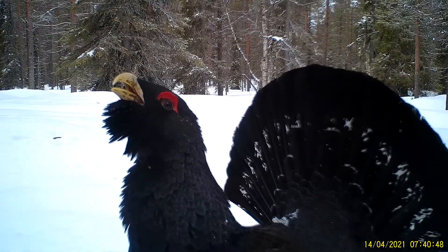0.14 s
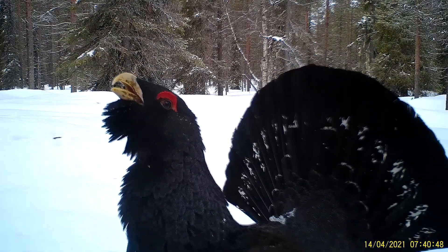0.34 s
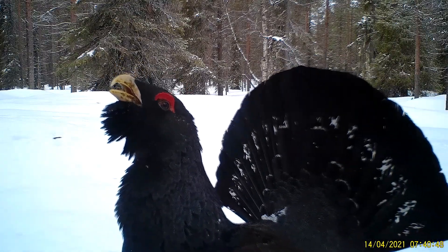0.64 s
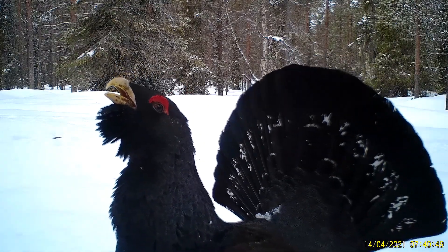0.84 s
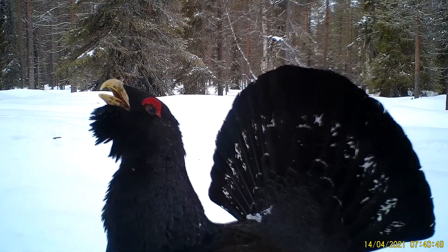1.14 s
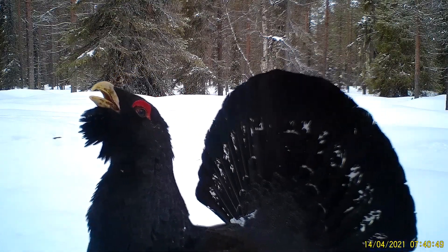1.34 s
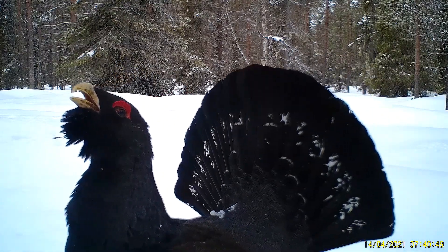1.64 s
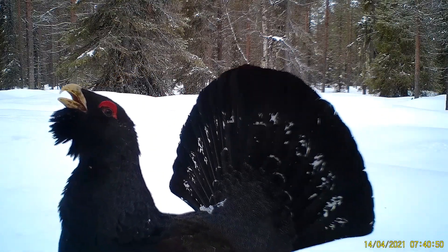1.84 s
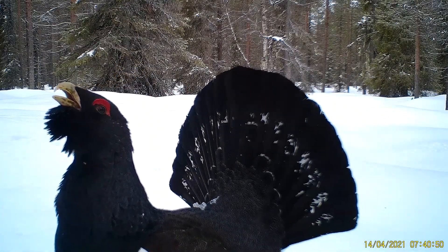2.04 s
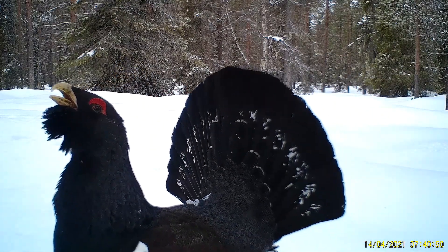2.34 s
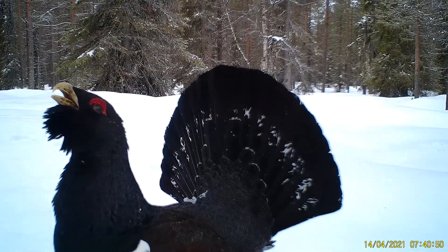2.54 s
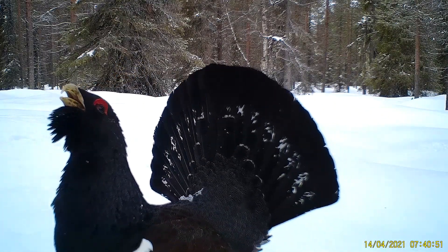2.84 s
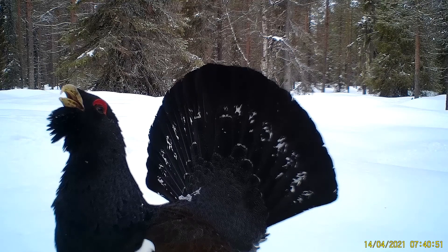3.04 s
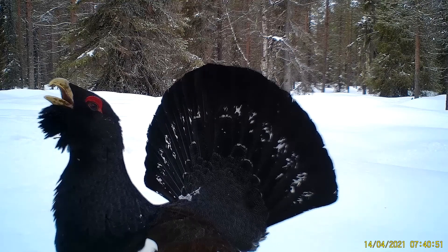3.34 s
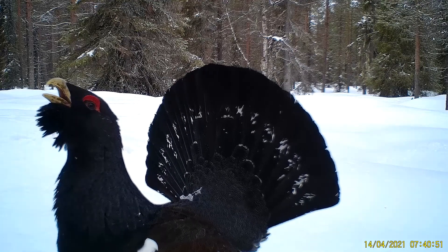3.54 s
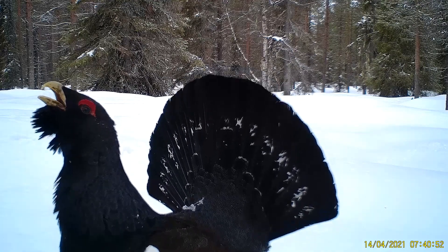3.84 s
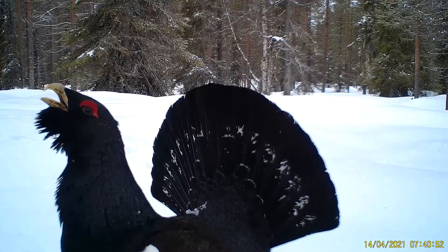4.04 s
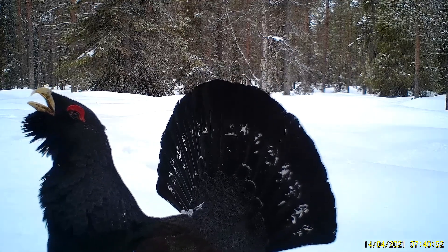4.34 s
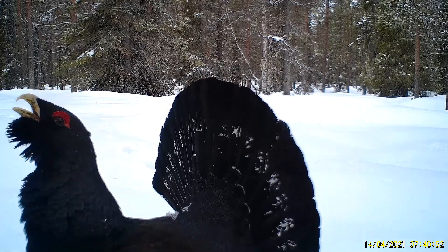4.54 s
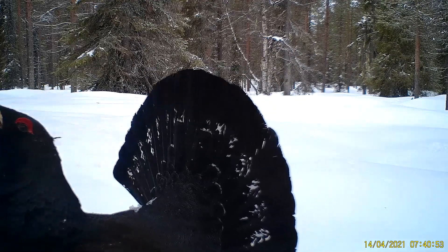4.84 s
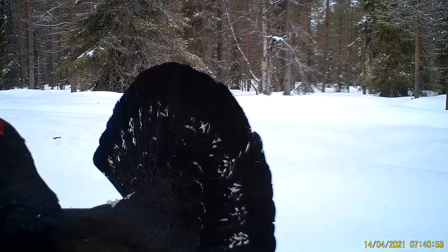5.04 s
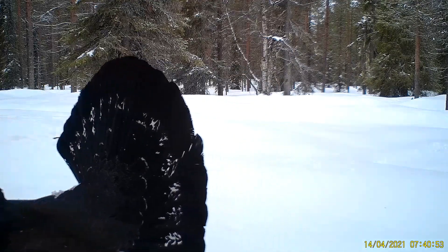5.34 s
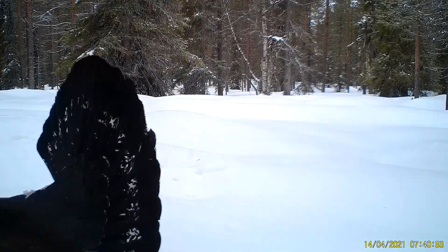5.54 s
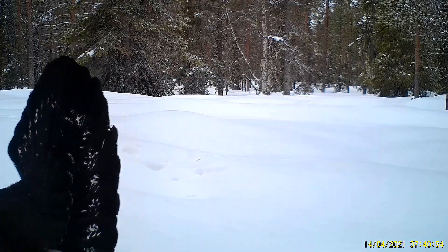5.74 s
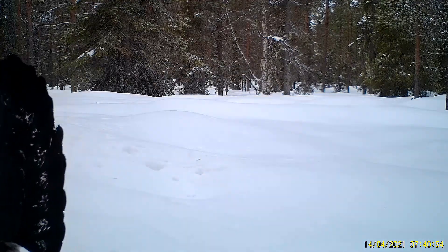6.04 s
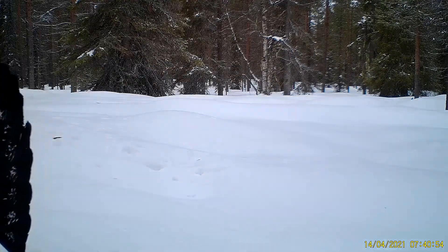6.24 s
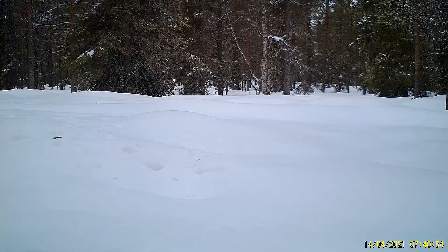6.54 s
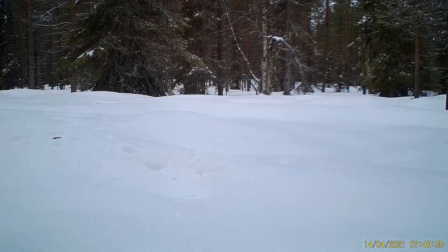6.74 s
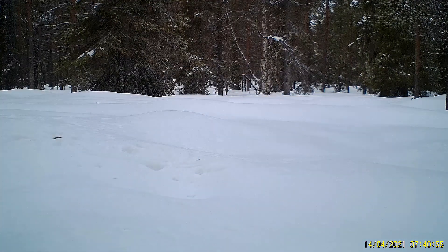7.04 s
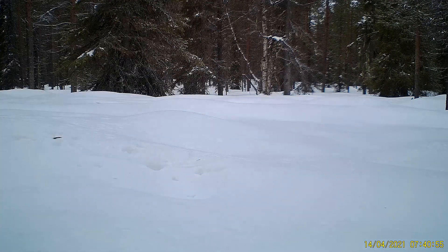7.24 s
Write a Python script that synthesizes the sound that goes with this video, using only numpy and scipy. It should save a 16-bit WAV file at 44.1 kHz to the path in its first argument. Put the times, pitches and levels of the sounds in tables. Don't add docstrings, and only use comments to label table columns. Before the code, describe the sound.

Very quiet outdoor air with small wind bumps and thin hiss. Sparse icy ticks and brief crunches come from feet on frozen snow, and a rival clicks faintly far away. Midway, two throat snaps almost fused into one pop far above everything else, with faint trunk echoes. A crunchy stamp follows, then a long scratchy rustle of quills over ice crystals, swelling in strides, dropping, and returning weaker. Near, dry, essentially mono pickup.

```python
import sys
import numpy as np
from scipy import signal
from scipy.fft import rfft, irfft, next_fast_len
from scipy.io import wavfile
from scipy.ndimage import uniform_filter1d

SR = 44100
rng = np.random.default_rng(int(sys.argv[2]) if len(sys.argv) > 2 else 0)


def store_wav(level_fs):
    pcm = np.round(np.clip(np.atleast_2d(level_fs), -1, 1) * 32767)
    wavfile.write(sys.argv[1], SR, pcm.T.astype(np.int16))


def undo_db(level):
    steps = np.asarray(level, float) / 20
    return 10 ** steps


N = 326278

# peak t/s, level/dB, half length/s
GUSTS = [(0.02, -66, 0.02), (0.113, -52, 0.048), (0.257, -54, 0.038), (.33, -61, 0.21), (0.83, -58, 0.025),
         (1.257, -58, 0.036), (1.83, -55, 0.023), (1.927, -48.5, 0.04), (2.12, -52.5, 0.02),
         (2.523, -54, 0.065), (2.64, -60, 0.062), (2.828, -56, 0.033), (3.178, -60.5, 0.072),
         (3.617, -65, 0.036), (3.92, -58, 0.034), (4.906, -54, 0.054), (5.055, -54, 0.031),
         (5.182, -67, 0.044), (5.4, -59, 0.023), (5.6, -54, 0.044), (5.691, -47.5, 0.027),
         (6.14, -61, 0.033), (6.305, -57.5, 0.024), (6.442, -53, 0.021)]
CALM_DB, CALM_SWING_DB = -69.5, 2
# t/s, level/dB
WOOD = [(0, -68.5), (.3, -65.5), (.7, -70), (1.4, -67), (1.8, -68), (2.15, -66.5), (2.5, -68),
        (3.55, -69.5), (3.72, -70.5), (3.9, -65), (4.25, -72.5), (7.4, -69)]
# f/Hz, level/dB per Hz
MURMUR = [(29, -25.5), (50, -1.5), (495, -11.5), (757, -16.5), (1030, -14.5), (2500, -28.5), (3250, -58.5),
          (5500, -120)]
RUMBLE_DB, RUMBLE_FOLLOWS = -62, 0.41
# f/Hz, level/dB per Hz
CIRCUIT = [(710, -38.5), (1200, -9.5), (2470, -9.5), (5150, -10), (6900, -9), (9330, -11.5), (14100, -10),
           (15200, -14.5), (15800, -18)]
CIRCUIT_DB = -71

# t/s, peak level/dB, dull part/dB, sharp part/dB
FOOT_TICKS = [(.671, -50, -15, -10), (0.833, -57, -11, -13), (.893, -47, -9, -14), (0.953, -50, -15, -1),
              (.9956, -59, -14, 0), (1.0794, -49, -8, -3), (1.0979, -50, -19, -16), (1.106, -47, -4, 2),
              (1.118, -48, -21, -6), (1.206, -46, -17, -3), (1.3835, -46.5, -3.5, -9),
              (1.516, -38.5, -22, -12), (1.547, -44, -6, 1), (1.5748, -46, -24, -21),
              (1.8432, -53, -17, -18), (1.912, -64, -16, -17), (1.961, -55, -19, 5), (2.0123, -54, -1, -2),
              (2.188, -58, -17, 0), (2.1974, -62, -13, -14), (2.362, -54, -19, -16), (2.442, -64, -18, -18),
              (2.462, -47.5, -23, -24), (2.574, -50, -19, -8), (2.695, -52, -26, -2),
              (2.8766, -50, -18, -5), (2.984, -66, -8, -15),
              (3.575, -46.5, -24, -25.5), (3.608, -45.5, -22.5, -20), (3.7269, -58, -16, -9),
              (3.76, -36, -29, -16), (4.0485, -52, -18, -21), (4.1006, -57, -18, -15),
              (4.162, -57, -17, -15.5), (4.4935, -39.5, -20, -22), (4.8103, -37, -29, -18),
              (5.031, -45, -24, -18), (5.3243, -41.5, 3.5, -19), (6.2148, -45.5, -28, 3),
              (6.2654, -43, -22, -17), (6.606, -39.5, -0.5, -20.5), (6.672, -41.5, 1, -15),
              (6.774, -47, -26, -22), (6.813, -54, -7, -15), (6.958, -40, -12, 0), (7.052, -49, -4, -15),
              (7.036, -46, -2, -11), (7.182, -40, -21, -16), (7.19, -49, -25, -22), (7.38, -52, 13, -14)]
TICK_S = 0.005
# t/s, peak level/dB, length/s, dull part/dB, sharp part/dB
CRUNCHES = [(1.2965, -49.5, 0.013, -9, -6), (1.475, -48.5, 0.034, -30, -0.5), (1.6621, -49.5, 0.0097, 1, 6),
            (2.8894, -55.5, 0.034, -17, -2), (3.7615, -37.5, 0.016, -6, 2.5), (3.776, -46, 0.01, -8, -3.5),
            (3.795, -35, 0.04, -23, -20), (3.785, -48, 0.02, -16, -13), (3.8254, -31.5, 0.018, -11, -5),
            (3.8571, -30, 0.011, -16.5, -11), (3.8925, -36.5, 0.012, -4.5, 0),
            (3.936, -47, 0.0087, -3, -12), (3.946, -48, 0.0062, -8, -12), (4.4376, -52, 0.0073, -13, -1),
            (6.271, -29.5, 0.009, -6, -10.5), (6.3355, -29, 0.017, -6, -8.5), (1.095, -52, 0.024, -18, -1),
            (1.495, -49, .05, -22, -9), (1.535, -48, 0.027, -20, -5)]
# t/s, hiss level/dB, swell/dB per s, fade/dB per s, quill weight/dB
BRUSHES = [
    (1.1, -73, 250, 303, 16),
    (1.33, -74.5, 30, 32, 6),
    (1.49, -70, 150, 85, 6.5),
    (1.62, -89, 30, 63, -5),
    (1.78, -86.5, 37, 22, 15),
    (2.08, -79.5, 11, 14.5, 12),
    (3.05, -79.5, 16, 71, 4.5),
    (3.841, -52, 240, 183, 10.5),
]
# t/s, hiss level/dB, quill weight/dB
DRAG = [(4.2, -104, -3), (4.48, -70, 3), (4.65, -64.5, 1), (4.9, -58, 6), (4.96, -61, 6), (5.02, -58.5, 3),
        (5.11, -56, -1), (5.2, -54, -2), (5.275, -47.5, 0), (5.39, -54, 1), (5.53, -53.5, 2.5),
        (5.6, -50, 0.5), (5.755, -48.5, 1), (5.87, -55, 2.5), (5.98, -50, -0.5), (6.06, -55.5, 3),
        (6.13, -49.5, -1), (6.19, -55, 4.5)]
# t/s, hiss level/dB, quill weight/dB
DRAG_STRIDE = [
    (6.25, -64.5, 7.5),
    (6.3, -57, 7.5),
    (6.36, -55, 0.5),
    (6.43, -63, 6.5),
    (6.48, -53.5, -2.5),
    (6.6, -55, 6.5),
    (6.708, -55.5, 4.5),
]
# t/s, hiss level/dB, quill weight/dB
DRAG_FAR = [
    (6.7, -74, -4),
    (6.8, -65.5, 1),
    (6.93, -59.5, 5.5),
    (7.13, -58, 6),
    (7.17, -62.5, 7.5),
    (7.28, -55.5, 2.5),
    (7.4, -61.5, 14),
]
LIFT_DB_PER_S = 422
# f/Hz, level/dB per Hz
DRAG_HISS = [(1470, -35), (2500, -27.5), (3130, -20.5), (4360, -9.5), (4750, -10), (5630, 0.5),
             (6080, -3.5), (7260, -0.5), (10400, -7.5), (11600, -10), (14700, -19), (15800, -28)]
# f/Hz, level/dB per Hz
DRAG_DULL = [(200, 2), (500, -7), (1200, -2.5), (2300, -1.5), (4000, 1), (5000, -2.5), (8000, -28)]
DULL_DB, SHARP_DB, SHARP_FOLLOWS = -12.5, -5, 0.43
# t/s, gain per quill upward/dB
TURN = [(4.4, 1.5), (5.2, 2.5), (5.8, 4.5), (6.2, 3.5), (6.6, 1.5), (7.0, 2.5), (7.4, 0.5)]
OUTER_START_S, OUTER_END_S, OUTER_DB = 5.93, 6.71, -15
OUTER_LOW_HZ, OUTER_HIGH_HZ = 8400, 10400

# t/s, peak level/dB, ring f/Hz
PINS = [(0.673, -49, 6000), (0.8332, -58, 8100), (0.8955, -53, 7000), (0.9563, -50, 8200),
        (0.9961, -62, 6700), (1.0797, -51, 6300), (1.0986, -44, 6100), (1.1214, -52, 5500),
        (1.2098, -46, 5600), (1.2974, -52, 7750), (1.4988, -53, 6900), (1.5185, -43, 6900),
        (1.5317, -50, 8000), (1.5379, -46, 6900), (1.5459, -44, 6440), (1.5998, -53, 6950),
        (1.6226, -55, 6400), (1.658, -58, 7400), (1.6786, -53, 6500), (1.913, -55, 6900),
        (1.9642, -51, 7100), (2.1909, -54, 6500), (2.199, -53, 6850), (2.3642, -60, 6800),
        (2.442, -58, 5600), (2.4666, -55, 6270), (2.6906, -54, 7000), (2.6972, -51.5, 6240),
        (2.7109, -57, 6800), (2.8137, -60, 6800), (2.8779, -54, 7700), (2.9424, -58, 7100),
        (2.9509, -62, 7400), (2.9953, -54, 7500), (3.0268, -53, 6700), (3.0723, -69, 7180),
        (3.7284, -55, 6200), (3.7578, -43, 6700), (3.9295, -48, 6800), (4.0499, -53, 6200),
        (4.1033, -59, 7200), (4.1599, -59.5, 6790), (4.4347, -55, 6900), (4.489, -50, 7400),
        (4.4938, -46, 7100), (4.7287, -43, 7600), (4.7492, -50, 7700), (4.8116, -33.5, 7500),
        (5.0386, -37, 6730), (5.3271, -37, 8200), (5.4499, -33.5, 7400), (5.7386, -33.5, 6900),
        (6.216, -39, 8750), (6.2662, -38, 8600), (6.3069, -43, 6580), (6.311, -40, 6770),
        (6.606, -39, 7500), (6.7125, -53, 7000), (6.7742, -42, 6030), (7.1925, -42, 6000)]
# t/s, peak level/dB, ring f/Hz
FAINT_PINS = [(0.8516, -53, 6150), (0.9961, -54, 8900), (1.1214, -47, 8000), (1.1442, -60, 7050),
              (1.2371, -52, 8000), (1.3022, -47, 6500), (1.3907, -54, 6700), (1.4865, -44, 5850),
              (1.4987, -45, 5900), (1.5527, -49, 6500), (1.6254, -55, 7500), (1.6574, -50, 11150),
              (1.7441, -53, 3500), (1.8389, -53, 7100), (1.8446, -53, 6800), (2.0638, -53, 6150),
              (2.1909, -49, 6900), (2.1991, -51, 6400), (2.2553, -57, 6700), (2.3214, -55, 7250),
              (2.4774, -55, 6030), (2.55, -57, 7200), (2.6173, -52, 7950), (2.8385, -58, 6750),
              (2.854, -54, 5600), (2.8582, -52, 8050), (2.9508, -54, 7700), (2.9647, -57, 7600),
              (2.9741, -57, 7700), (3.0105, -57, 8120), (3.0723, -59, 7250), (3.1098, -59, 7200),
              (3.127, -59, 7700), (3.1444, -56.5, 7650), (3.6089, -54.5, 6300), (3.6299, -56, 5950),
              (3.6425, -59, 7200), (3.6782, -58, 10550), (3.7663, -33, 7450), (3.8075, -33, 7700),
              (3.8297, -31, 6750), (3.9474, -42, 5700), (4.0082, -48, 6800), (4.1638, -56.5, 6300),
              (4.1905, -57, 7600), (4.2099, -59.5, 7400), (4.248, -58, 7900), (4.4382, -50, 6550),
              (4.8886, -43, 7400), (4.9043, -40, 7100), (4.908, -41, 7150), (5.3241, -28, 7650),
              (5.7385, -33, 7060), (6.1501, -35, 7150), (6.9254, -40, 7250), (7.0379, -41, 5100),
              (7.0557, -42, 6250), (7.2095, -43, 7100)]
PIN_DB, FAINT_PIN_DB, PIN_CRACK_DB, PIN_T60_S = 2.5, -3.5, -8.5, 0.0035

# t/s, level/dB, longer ring f/Hz, shorter ring f/Hz, length/s
RIVAL = [
    (1.734, -70, 2440, 5400, 0.085),
    (1.735, -72, 5600, 6100, 0.096),
    (1.736, -70.5, 3650, 2030, 0.063),
    (1.765, -74, 6200, 4700, 0.097),
    (2.03, -65, 2180, 3300, 0.003),
    (2.043, -74, 3300, 2720, 0.1),
    (2.198, -71.5, 3300, 6840, 0.044),
    (2.233, -69, 6340, 3220, 0.042),
    (7.115, -59, 3480, 3970, 0.014),
]
RIVAL_SHORTER_DB = -1.5

RATTLE_START_S, RATTLE_DB, RATTLE_HZ = 2.0277, -52, 2000
RATTLE_GAP_S, RATTLE_LOSS_DB, RATTLE_RISE_HZ = .0103, 1.5, 300
# t/s, peak level/dB, ring f/Hz
SLABS = [
    (3.766, -52, 2200),
    (3.774, -50, 2150),
    (3.938, -50, 2250),
    (6.2725, -42.5, 1490),
    (6.274, -33, 3930),
    (7.381, -43, 2570),
    (7.384, -49, 1700),
    (7.122, -50, 3400),
]
KNOCK_T60_S = 0.013

# t/s, peak level/dB, snow bounce delay/s, bounce level/dB
CLICK = [
    (3.1728, -8.6, .00059, -9),
    (3.1759, -5.6, .00078, -11.5),
]
# f/Hz, level/dB, t60/s
THROAT = [(1290, -13, .012), (1590, -19.5, .008), (2255, -14, .010), (2700, -2.5, .0016), (2890, -21, .011),
          (3200, -25, .01), (3570, -22, .0125), (4100, -24, .011), (5230, -24, .009), (6330, -12.5, .0052),
          (6950, -31, .02), (7700, -17, .0048), (11250, -18, .0046), (12700, -24, .006)]
CHEST_HZ, CHEST_DB, CHEST_T60_S = 505, -29.5, 0.021
BEAK_CUT_HZ = 1180
PUFF_DB, PUFF_T60_S = -32, 0.017
THUMP_HZ, THUMP_DB, THUMP_T60_S = 170, -39, .03
# level/dB, t60/s, low-pass f/Hz
SCATTER = [
    (-33, 0.0321, 12000),
    (-52, 0.13, 5980),
    (-57, 0.28, 5500),
]
# delay/s, level/dB
TRUNKS = [
    (.158, -45.5),
    (0.162, -62),
    (.198, -48),
    (.203, -58),
]

# t/s, step level/dB re mean line
STARVED = [(.196, 7.5), (.661, 8.5), (.939, 11.5), (1.264, 13), (1.427, 15), (1.566, 11), (1.613, 17.5),
           (1.891, 14), (2.472, 12), (2.495, 15), (2.518, 14), (3.006, 15), (3.494, 12.5), (3.54, 12.5),
           (3.61, 9.5), (3.865, 12.5), (4.469, 12), (5.049, 10.5), (5.746, 5.5), (6.024, 9), (6.303, 11),
           (6.466, 7), (7.232, 8.5), (7.278, 9), (7.302, 11), (7.348, 10)]
STEP_FOLLOWS, STEP_SPREAD_DB = 0.41, 4.5
# t/s, low f/Hz, high f/Hz
SPLIT = [(.405, 4700, 6400), (.614, 5700, 7000), (.614, 7700, 11000), (.614, 11800, 13800),
         (.707, 4300, 7000), (.707, 9000, 10400), (.73, 6400, 7600), (.73, 11800, 13000),
         (1.171, 11000, 12400), (1.171, 13800, 15800), (3.099, 5200, 7000), (3.47, 9600, 11000),
         (4.283, 4200, 5200), (4.283, 12400, 13800), (5.189, 6300, 7600), (5.189, 9600, 13000),
         (5.212, 14500, 15800), (5.212, 11000, 12400), (6.071, 5600, 7000), (6.071, 10300, 11800),
         (6.907, 6300, 7600), (6.907, 11700, 13800)]
SPLIT_DB = -4.5
HOP, GRID = 1024, 464


def rms_one(x):
    return x / np.sqrt(np.mean(x ** 2) + 1e-20)


def in_time(rows):
    s, *columns = np.transpose(rows)
    return [np.interp(np.arange(N) / SR, s, c) for c in columns]


def colour(x, spectrum):
    hz, level_db = np.transpose(spectrum)
    size = next_fast_len(N)
    grid_hz = np.arange(size // 2 + 1) * SR / size + 1
    gain = undo_db(np.interp(np.log(grid_hz), np.log(hz), level_db))
    return rms_one(irfft(rfft(x, size) * gain, size)[:N])


def drift(rate_hz):
    r = np.exp(-2 * np.pi * rate_hz / SR)
    return rms_one(signal.lfilter([1], [1, -2 * r, r * r], rng.standard_normal(N + SR))[SR:])


def ring(x, hz, t60_s):
    r, w = undo_db(-60 / (t60_s * SR)), 2 * np.pi * hz / SR
    return signal.lfilter([0, np.sin(w)], [1, -2 * r * np.cos(w), r * r], x + 1e-18)


def fading(length, t60_s):
    return undo_db(-60 * np.arange(length) / SR / t60_s)


def low_pass(x, hz):
    return signal.sosfilt(signal.butter(2, min(hz, 20000), fs=SR, output="sos"), x)


def band_pass(x, order, low_hz, high_hz):
    return signal.sosfilt(signal.butter(order, [low_hz, high_hz], "band", fs=SR, output="sos"), x)


def air(hiss_db):
    t = np.arange(0, N, 64) / SR
    gusts = sum(undo_db(db) * np.exp(-((t - s) / half_s) ** 2) for s, db, half_s in GUSTS)
    gusts = undo_db(CALM_DB + CALM_SWING_DB * drift(3.5)) + np.interp(np.arange(N) / SR, t, gusts)
    wind = band_pass(low_pass(rng.standard_normal(N + SR), 48), 1, 14, 46)[SR:]
    wood_db, = in_time(WOOD)
    rumble_db = RUMBLE_DB + RUMBLE_FOLLOWS * (hiss_db + 50.5)
    murmur = colour(rng.standard_normal(N), MURMUR) * np.hypot(undo_db(wood_db), undo_db(rumble_db))
    murmur *= undo_db(1.5 + 1.2 * drift(16))
    circuit = undo_db(CIRCUIT_DB) * colour(rng.standard_normal(N), CIRCUIT)
    return rms_one(wind) * gusts + murmur + circuit


def drag():
    t = np.arange(N) / SR
    long_db, long_weight = in_time(DRAG + DRAG_STRIDE)
    long_db = long_db - LIFT_DB_PER_S * np.maximum(t - DRAG_STRIDE[-1][0], 0) - 100 * (t < DRAG[0][0])
    far_db, far_weight = in_time(DRAG_FAR)
    levels = [long_db, far_db - 100 * (t < DRAG_FAR[0][0])]
    weights = [long_weight, far_weight]
    for s, db, swell, fade, weight in BRUSHES:
        levels.append(db - swell * np.maximum(s - t, 0) - fade * np.maximum(t - s, 0))
        weights.append(np.full(N, weight))
    power = undo_db(levels) ** 2
    total = power.sum(axis=0)
    return 10 * np.log10(total), (power * weights).sum(axis=0) / total


def crystals(per_s, spread_db):
    sizes = undo_db(spread_db * np.minimum(rng.exponential(1, N), 5)) * rng.choice([-1, 1], N)
    return rms_one(sizes * (rng.random(N) < per_s / SR))


def add_breaks(dull, body, sharp):
    ticks = [(s, peak_db, TICK_S, low_db, high_db) for s, peak_db, low_db, high_db in FOOT_TICKS]
    for events, suddenness, blunt in (ticks, 5.0, 2.1), (CRUNCHES, 3.5, 3.0):
        for s, peak_db, length_s, low_db, high_db in events:
            start = round(s * SR)
            age = np.arange(round(.08 * SR)) / SR / np.clip(length_s, .001, .04)
            shape = ((1 - np.exp(-suddenness * age)) * np.exp(-age ** blunt))[:N - start]
            span = slice(start, start + len(shape))
            for part, part_db in (dull, low_db), (body, 0), (sharp, high_db):
                part[span] = np.hypot(part[span], undo_db(peak_db + part_db - 10.5) * shape)


def quills(hiss):
    out, (turn_db,) = 0, in_time(TURN)
    edges_hz = np.geomspace(2500, 9500, 6)
    for k, edge_hz in enumerate(zip(edges_hz, edges_hz[1:])):
        band = signal.sosfiltfilt(signal.butter(1, edge_hz, "band", fs=SR, output="sos"), hiss)
        out = out + band * undo_db(1.6 * drift(12) + turn_db * (k - 3.4))
    return rms_one(out)


def outer_quill(snaps):
    corners_s = [OUTER_START_S, OUTER_START_S + .08, OUTER_END_S, OUTER_END_S + .01]
    touch = np.interp(np.arange(N) / SR, corners_s, [0, 1, 1, 0])
    return undo_db(OUTER_DB) * touch * rms_one(band_pass(snaps, 4, OUTER_LOW_HZ, OUTER_HIGH_HZ))


def wings(hiss_db, weight_db):
    hiss_db = hiss_db + 0.81 * drift(25) + 0.16 * drift(120)
    dull = undo_db(hiss_db + DULL_DB + weight_db)
    body = undo_db(hiss_db)
    sharp = undo_db(hiss_db + SHARP_DB + SHARP_FOLLOWS * weight_db)
    add_breaks(dull, body, sharp)
    snaps = crystals(12000, spread_db=2.0) + 0.712 * rng.standard_normal(N)
    snaps += 0.04 * crystals(250, spread_db=5.5) * np.clip(body / undo_db(-49), 0, 1)
    hiss = colour(snaps, DRAG_HISS)
    hiss = hiss + undo_db(-8.5) * rms_one(ring(hiss, 7700, 0.00109))
    hiss = hiss + undo_db(-21.0) * rms_one(ring(hiss, 11600, 0.00091))
    top = signal.sosfiltfilt(signal.butter(2, 9500, "high", fs=SR, output="sos"), hiss)
    scrape = quills(hiss) + outer_quill(snaps)
    return dull * colour(snaps, DRAG_DULL) + body * scrape + sharp * rms_one(top)


def pins():
    out, length = np.zeros(N), round(.01 * SR)
    snaps = PINS + [(s, db + FAINT_PIN_DB, hz) for s, db, hz in FAINT_PINS]
    cracks = rng.standard_normal((len(snaps), length)) * fading(length, 0.0017)
    cracks = band_pass(cracks, 2, 3000, 11000)
    for (s, peak_db, hz), crack in zip(snaps, cracks):
        tone = np.sin(2 * np.pi * hz * np.arange(length) / SR) * fading(length, PIN_T60_S)
        start = round(s * SR)
        out[start:start + length] += undo_db(peak_db + PIN_DB) * (tone + undo_db(PIN_CRACK_DB) * crack)
    return out


def rival():
    out, length = np.zeros(N + SR), round(.3 * SR)
    age = np.arange(length) / SR
    for s, level_db, low_hz, high_hz, length_s in RIVAL:
        noise = rng.standard_normal((2, length))
        rings = rms_one(ring(noise[0], low_hz, 0.019))
        rings = rings + undo_db(RIVAL_SHORTER_DB) * rms_one(ring(noise[1], high_hz, 0.0081))
        swell = (1 - np.exp(-age / 0.00069)) * np.exp(-(age / length_s) ** 2)
        start = round(s * SR)
        out[start:start + length] += undo_db(level_db) * rings * swell
    return out[:N]


def knocks():
    rattle = [(RATTLE_START_S + k * RATTLE_GAP_S, RATTLE_DB - k * RATTLE_LOSS_DB,
               RATTLE_HZ + RATTLE_RISE_HZ * min(k, 3)) for k in range(5)]
    out, length = np.zeros(N + SR), round(.02 * SR)
    age = np.arange(length) / SR
    shape = fading(length, KNOCK_T60_S) * (1 - np.exp(-age / 0.00071))
    for s, peak_db, hz in rattle + SLABS:
        tone = np.sin(2 * np.pi * hz * age) + 0.53 * np.sin(2 * np.pi * 1.33 * hz * age)
        start = round(s * SR)
        out[start:start + length] += undo_db(peak_db) * tone * shape
    return out[:N]


def throat_voice(length):
    u = (np.arange(length) / SR - .0002) / .000042
    snap = (1 - u ** 2) * np.exp(-u ** 2 / 2)
    voice = sum(undo_db(level_db) * ring(snap, hz, t60_s) for hz, level_db, t60_s in THROAT)
    beak = signal.cheby2(6, 34, .81 * BEAK_CUT_HZ, "high", fs=SR, output="sos")
    voice = signal.sosfilt(beak, voice)
    voice = signal.lfilter(*signal.iirnotch(9900, 4.0, fs=SR), voice)
    voice += undo_db(CHEST_DB) * ring(low_pass(low_pass(snap, 500), 500), CHEST_HZ, CHEST_T60_S) * 40
    voice /= voice.max()
    puff = band_pass(rng.standard_normal(length), 3, 11500, 14000)
    voice += undo_db(PUFF_DB) * puff * fading(length, PUFF_T60_S)
    voice += undo_db(THUMP_DB) * ring(np.arange(length) == 9, THUMP_HZ, THUMP_T60_S)
    return voice


def throat_click():
    length = round(.4 * SR)
    voice = throat_voice(length)
    wood = sum(undo_db(level_db) * low_pass(rng.standard_normal(length), hz) * fading(length, t60_s)
               for level_db, t60_s, hz in SCATTER)
    wood *= 1 - np.exp(-np.arange(length) / SR / 0.00222)
    trunks = np.zeros(length)
    trunks[[round(lag_s * SR) for lag_s, db in TRUNKS]] = undo_db(np.array(TRUNKS)[:, 1])
    heard = voice + signal.fftconvolve(voice, wood + low_pass(trunks, 2100) * 2.3)[:length]
    strikes = np.zeros(N)
    for s, peak_db, lag_s, bounce_db in CLICK:
        start_s = s - .0002
        strikes[[round(start_s * SR), round((start_s + lag_s) * SR)]] = undo_db([peak_db, peak_db + bounce_db])
    return signal.fftconvolve(strikes, heard)[:N]


def scene():
    hiss_db, weight_db = drag()
    mono = air(hiss_db) + wings(hiss_db, weight_db) + pins() + rival() + knocks() + throat_click()
    return np.array([mono, mono])


def frame_start(s):
    return GRID + HOP * (round((s * SR - GRID) / HOP) - 1)


def starve(x):
    n, k = np.arange(2 * HOP) + .5, np.arange(HOP) + .5
    window = np.sin(np.pi * n / (2 * HOP))
    basis = np.sqrt(2 / HOP) * window * np.cos(np.pi / HOP * np.outer(k, n + HOP / 2))
    out = x.copy()
    width, chance = 28, rng.standard_normal((len(STARVED), 37))
    for (s, step_db), luck in zip(STARVED, chance):
        at = frame_start(s)
        lines = basis @ x[at:at + 2 * HOP]
        mean_power = np.mean(lines[40:700] ** 2)
        local = uniform_filter1d(lines ** 2, size=5 * width) / mean_power + 1e-9
        step = undo_db(step_db) * np.sqrt(mean_power) * local ** (STEP_FOLLOWS / 2)
        step = step * undo_db(STEP_SPREAD_DB * luck.repeat(width)[:HOP])
        lost = lines - step * np.round(lines / step)
        lost[:14] = 0
        out[at:at + 2 * HOP] -= .97 * lost @ basis
    return out


def split(x):
    out, hz = np.zeros(N), np.arange(HOP + 1) * SR / (2 * HOP)
    window = np.sin(np.pi * np.arange(2 * HOP) / (2 * HOP))
    for s, low_hz, high_hz in SPLIT:
        at = frame_start(s)
        lines = rfft(x[at - 2 * HOP:at]) * (hz > low_hz) * (hz < high_hz)
        out[at:at + 2 * HOP] += undo_db(SPLIT_DB) * irfft(lines) * window
    return out


def top_cut(x):
    return signal.sosfilt(signal.butter(12, 15790, fs=SR, output="sos"), x)


def record(dry):
    mono = starve(dry[0])
    apart = split(mono)
    return top_cut(np.array([mono + apart, mono - apart]))


dry = scene()
out = record(dry)
store_wav(out)
```